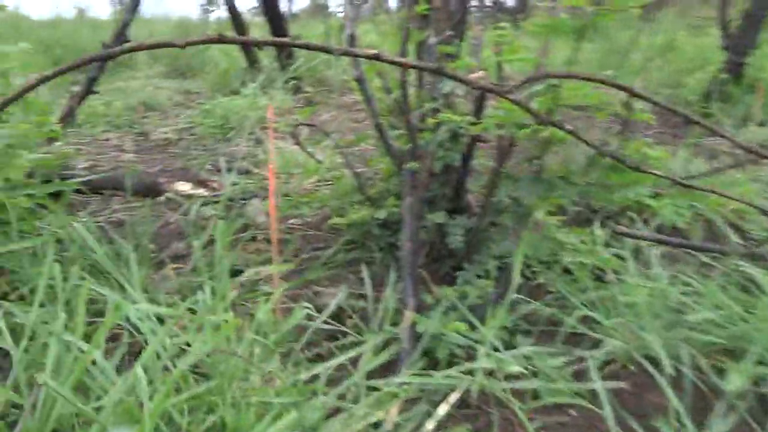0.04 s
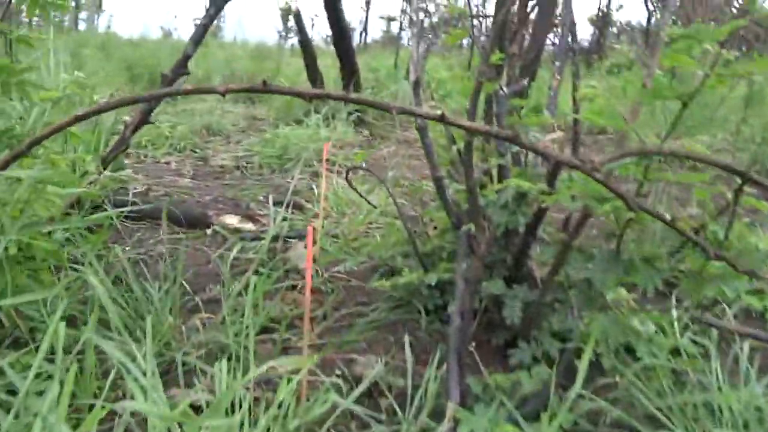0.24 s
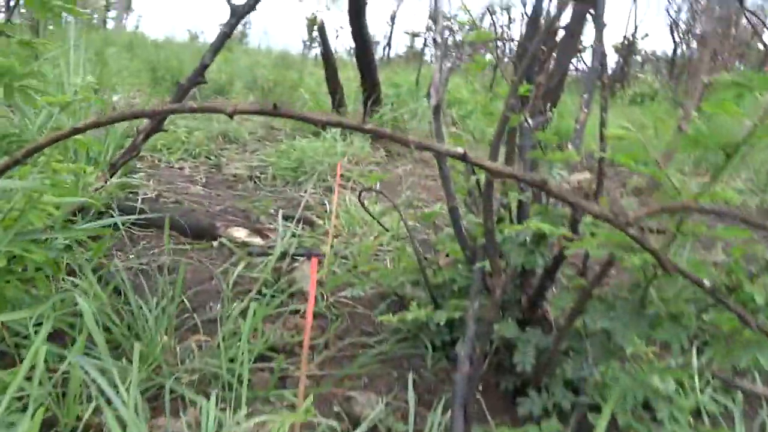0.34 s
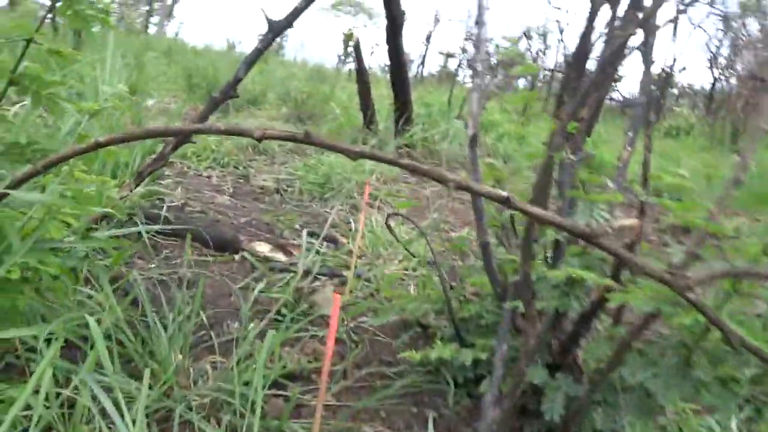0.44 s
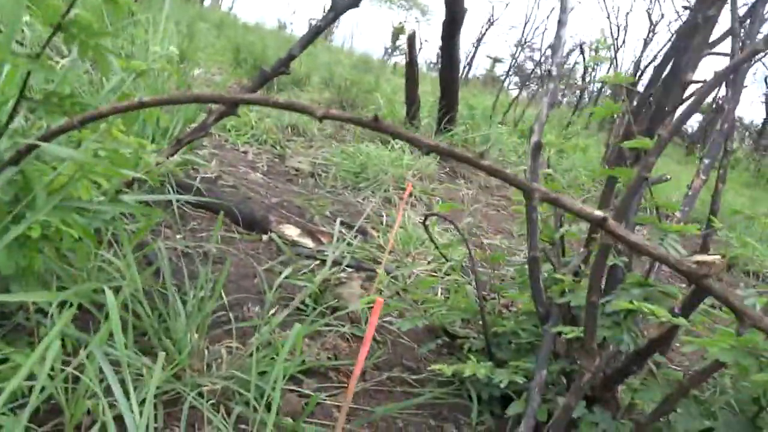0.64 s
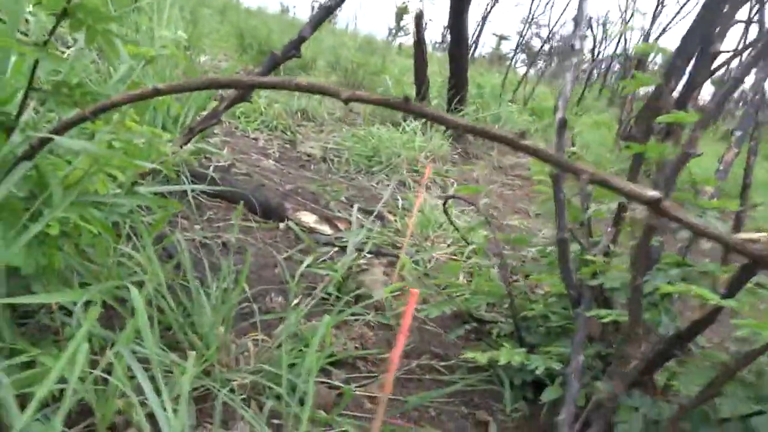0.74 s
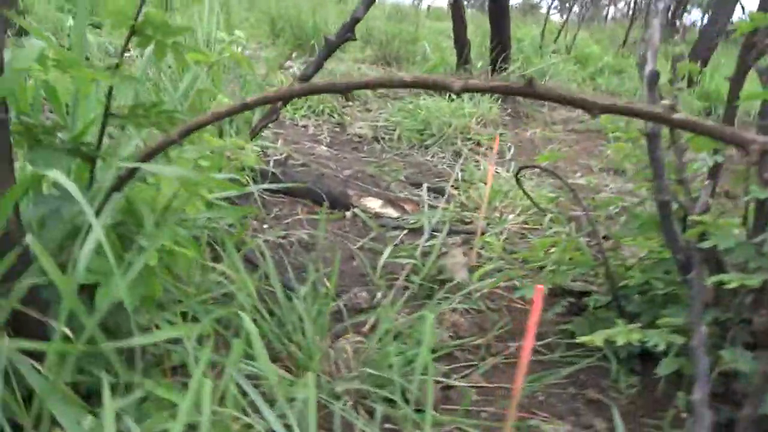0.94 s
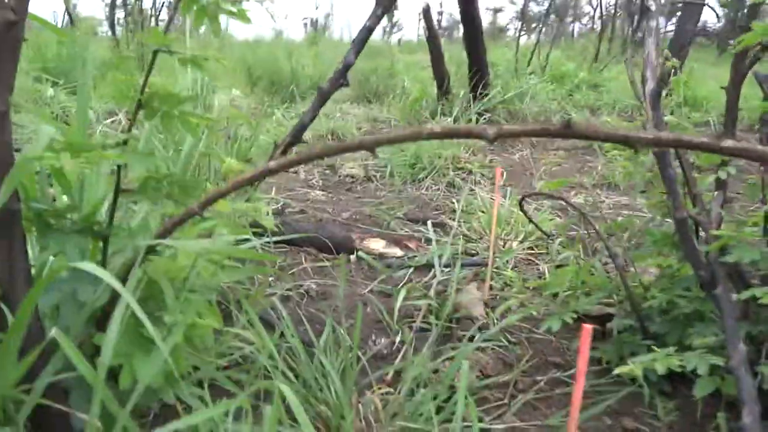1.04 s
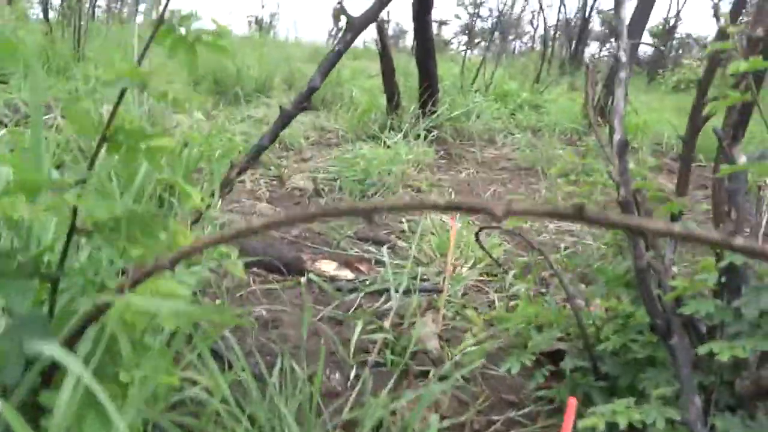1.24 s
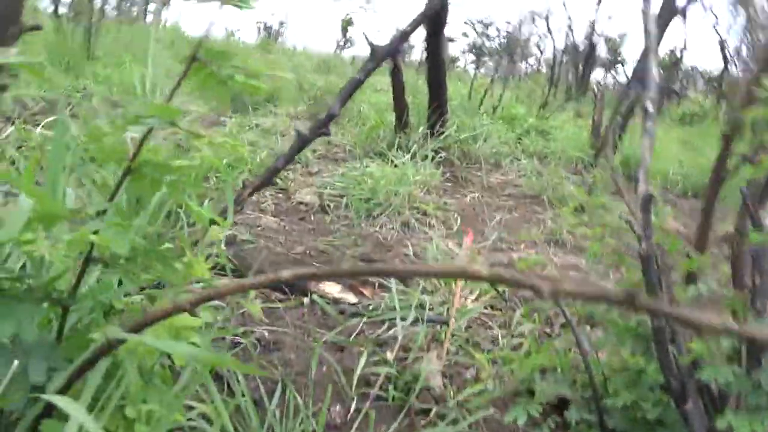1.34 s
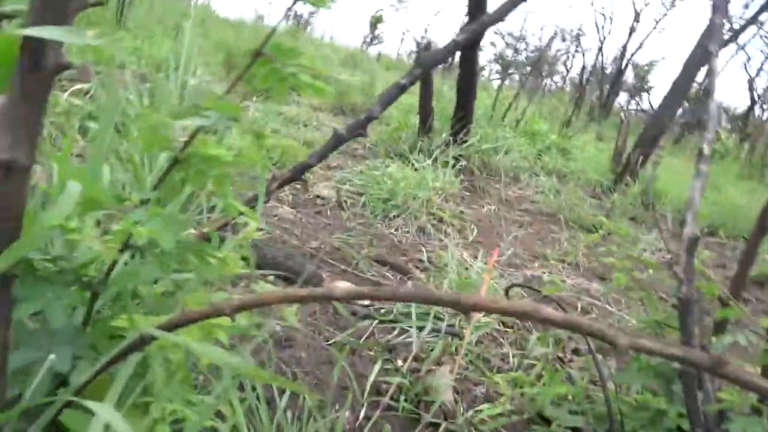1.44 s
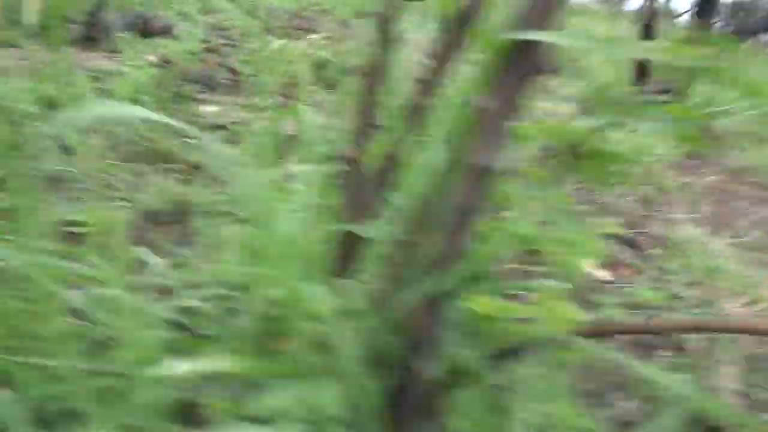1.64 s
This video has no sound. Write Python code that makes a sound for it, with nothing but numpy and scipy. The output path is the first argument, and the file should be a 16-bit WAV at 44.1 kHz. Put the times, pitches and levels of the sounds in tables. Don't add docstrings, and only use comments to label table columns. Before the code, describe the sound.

Pushing through grass and shrubs, close and dry. A faint open-field hum with tiny far bird chirps in the first 0.2 s; low wind puffs thump around 0.25-0.4 s. Grass hisses from 0.4 s; from 0.6 s stems rub dully and twigs knock, with bright snaps thickest at 0.72-0.83 s. A second gust and lighter brush, leaning right, come near 1.06 s, then sparse ticks fade until 1.7 s.

```python
import sys
import numpy as np
from scipy import signal
from scipy.fft import rfft, irfft, next_fast_len
from scipy.io import wavfile
from scipy.ndimage import uniform_filter1d, map_coordinates

SR = 44100
rng = np.random.default_rng(int(sys.argv[2]) if len(sys.argv) > 2 else 0)


def convert_level_to_amplitude(level_db):
    exponent = np.asarray(level_db, float) / 20
    return 10 ** exponent


def persist_wave(psi):
    counts = np.round(np.clip(psi, -1, 1) * 32767).astype(np.int16)
    wavfile.write(sys.argv[1], SR, np.atleast_2d(counts).T)


N = 74970

# t/s, left over right/dB
SIDE_OF_PATH = [
    (0, 0.5),
    (.95, 0),
    (1.0, -4),
    (1.08, -7.5),
    (1.14, 3),
    (1.22, -5),
    (1.45, -1),
    (1.56, 3),
]


def unit(x):
    return x / np.sqrt(np.mean(x ** 2) + 1e-20)


def along(points, hz):
    f, v = np.transpose(points)
    return np.interp(np.log(hz + 1), np.log(f + 1), v)


def curve(rows):
    s, v = np.transpose(rows)
    return np.interp(np.arange(N) / SR, s, v)


def wobble(rate):
    return map_coordinates(rng.standard_normal(400), [np.arange(N) * rate / SR])


def filtered(x, response):
    m = next_fast_len(x.shape[-1] + 8192)
    return irfft(rfft(x, m) * response(np.fft.rfftfreq(m, 1 / SR)), m)[..., :x.shape[-1]]


def ring(f, hz, width):
    return 1j * f * width / (hz * hz - f * f + 1j * f * width)


def rush(spectrum, patchy_db):
    # f/Hz, likeness (0 to 1)
    likeness = [(100, 0.99), (500, 0.85), (2500, 1), (5000, 1), (10000, 1)]
    z = signal.stft(rng.standard_normal((2, N)), nperseg=256)[2]
    patches = uniform_filter1d(rng.standard_normal(z.shape[1:]), size=5, axis=0)
    patches = uniform_filter1d(patches, size=8, axis=1)
    pair = signal.istft(z * convert_level_to_amplitude(patchy_db * unit(patches)), nperseg=256)[1][:, :N]

    def colour(hz):
        turn = np.arccos(np.clip(along(likeness, hz), -1, 1)) / 2
        return convert_level_to_amplitude(along(spectrum, hz)) * [np.cos(turn), np.sin(turn)]

    mid, side = filtered(pair, colour)
    return unit(np.array([mid + side, mid - side]))


def grains(hz, spread, cycles, scatter_db, count, size):
    u, g = rng.random((count, 2)), rng.standard_normal((count, 2))
    pitch = np.clip(hz * np.exp(spread * g[:, :1]), 100, 15000)
    t = np.arange(size) / SR
    level = convert_level_to_amplitude(-scatter_db * np.log(u[:, 1:] + 0.022))
    wave = level * np.sin(2 * np.pi * pitch * t) * np.exp(-t * pitch / cycles)
    at = ((u[:, :1] * N).astype(int) + np.arange(size)).ravel()
    pan = 0.75 * g[:, 1:]
    left, right = [np.bincount(at, (wave * convert_level_to_amplitude(side * pan)).ravel(), N + size)[:N] for side in (1, -1)]
    return unit(np.array([left, right]))


def add(track, s, sound, pan_db, skew=0):
    i = round(s * SR)
    track[0, i + skew:i + skew + len(sound)] += convert_level_to_amplitude(pan_db / 2) * sound
    track[1, i:i + len(sound)] += convert_level_to_amplitude(-pan_db / 2) * sound


def blow(db, t60, colour, spike):
    rise_s, spike_s = 0.00088, 0.0011
    t = np.arange(2000) / SR
    crackle = rng.standard_normal(len(t)) * convert_level_to_amplitude(-60 * t / t60) * (1 - np.exp(-t / rise_s))
    crackle[round(min(spike_s, t60 / 8) * SR)] += spike
    burst = filtered(crackle, colour)
    return convert_level_to_amplitude(db) * burst / np.abs(burst).max()


def field():
    # f/Hz, level/dB
    hum_colour = [(18, -44), (30, 5), (95, -4), (179, -26), (1630, -12.5), (3670, -23.5), (8300, -26),
                  (10200, -23.5), (16000, -31.5)]
    return convert_level_to_amplitude(-55.5) * rush(hum_colour, patchy_db=3.36)


def bird():
    # t/s, length/s, f/Hz, level/dB
    chirps = [
        (.004, .05, 3200, -63),
        (.022, .033, 7400, -65),
        (.156, .012, 7700, -61),
    ]
    t = np.arange(N) / SR
    out = np.zeros(N)
    for s, length, hz, db in chirps:
        swell = np.exp(-((t - s - length / 2) / (0.5 * length)) ** 4)
        out += convert_level_to_amplitude(db) * swell * np.sin(2 * np.pi * hz * t)
    return out


def air():
    # t/s, level/dB
    strength = [(0, -59.5), (.09, -56), (.14, -43), (.18, -53), (.23, -51.5), (.31, -32.5), (.4, -45.5),
                (.5, -63), (.6, -51), (.85, -50), (.97, -63), (1.035, -53), (1.06, -34.5), (1.14, -34.5),
                (1.22, -45.5), (1.4, -62.5), (1.62, -61.5), (1.7, -53)]
    # f/Hz, level/dB
    rumble_colour = [(15, -49), (25, -14.5), (75, 2), (107, 1.5), (183, -2.5), (277, -15), (307, -17),
                     (500, -33), (650, -76), (1100, -120)]
    # t/s, peak level/dB, f/Hz
    puffs = [(.135, -35.5, 129), (.158, -38, 102), (0.213, -37, 123), (.242, -25.5, 150), (0.289, -26, 98),
             (0.302, -24.5, 156), (0.333, -25.5, 125), (0.361, -39, 146), (.395, -28, 106),
             (.457, -35, 147), (0.637, -44, 69.5), (0.682, -38, 90), (0.769, -28, 272), (.8, -30.5, 247),
             (0.841, -32.5, 237), (.875, -43, 100), (.927, -41.5, 83), (1.016, -35.5, 91),
             (1.051, -27, 125), (1.06, -22.5, 142), (1.078, -32.5, 77), (1.089, -25.5, 156),
             (1.107, -24.5, 122.5), (1.123, -32, 101), (1.138, -32, 127), (1.17, -31, 111),
             (1.199, -36.5, 86.5), (1.265, -41.5, 80), (1.337, -41, 73), (1.536, -49.5, 53.6),
             (1.68, -39.5, 91)]
    rumble = convert_level_to_amplitude(curve(strength) + 3 * wobble(40)) * rush(rumble_colour, patchy_db=-0.3)
    out = np.pad(rumble, ((0, 0), (0, SR)))
    t = np.arange(-2500, 2500) / SR
    for (s, db, hz), turn in zip(puffs, rng.random(60)):
        wave = np.cos(2 * np.pi * (hz * t + turn))
        wave += 0.11 * np.cos(2 * np.pi * (2.19 * hz * t + 2 * turn))
        swell = np.exp(-(t * hz / 0.79) ** 2)
        add(out, s + t[0], convert_level_to_amplitude(db) * swell * wave, 0)
    return out[:, :N]


def snaps():
    # t/s, peak level/dB, f/Hz, t60/s, width over pitch
    breaks = [(.106, -43.5, 2880, 0.015, 0.32), (.107, -52, 6600, .02, 0.083),
              (0.143, -42, 7200, 0.021, 0.31), (0.224, -45, 6170, .012, 0.28),
              (0.7174, -24, 3960, 0.015, 0.47), (.728, -17.5, 10370, 0.017, 0.37),
              (0.736, -18, 12900, 0.008, 0.4), (0.7375, -28, 11600, .012, .45),
              (0.7533, -29, 6350, 0.011, .09), (0.756, -25, 11000, .02, 0.33),
              (0.7613, -10.5, 10430, 0.013, 0.18), (0.763, -21.5, 5800, 0.024, 1.1),
              (0.7672, -22, 11400, .008, .4), (.777, -20.5, 10100, 0.037, 0.23),
              (0.782, -24, 10600, .009, .3), (0.7851, -12.5, 10650, 0.018, 0.28),
              (0.7837, -23.5, 6370, 0.025, 0.35), (.7905, -22, 10800, .012, 0.26),
              (0.8028, -25, 10460, 0.031, 0.24), (0.806, -29, 5000, 0.00604, 0.68),
              (0.827, -28, 8300, 0.031, 0.056), (0.8267, -23.5, 9900, 0.031, 0.21),
              (0.827, -26, 4170, 0.0081, .9), (.855, -36, 5700, .012, 0.59),
              (1.069, -21, 7100, 0.0046, 0.85), (1.069, -31, 2280, 0.02, 0.42),
              (1.137, -32, 8500, .005, 0.9), (1.137, -39.5, 2280, .012, 0.33),
              (1.212, -39, 2860, 0.021, 0.38), (1.211, -38, 9000, 0.0055, 0.54),
              (1.232, -39, 8500, 0.0076, 0.46), (1.353, -34, 10000, 0.0093, 0.8),
              (1.455, -29.5, 10800, 0.0086, 0.26)]
    out, pan_db = np.zeros((2, N + SR)), curve(SIDE_OF_PATH)
    for s, db, hz, t60, wide in breaks:
        crack = lambda f: ring(f, hz, wide * hz) ** 2 + 0.12 * ring(f, hz / 2, 0.8 * hz) ** 3
        add(out, s, blow(db, t60, crack, spike=2.33), pan_db[round(s * SR)], int(wide > 1))
    return out


def grass():
    # t/s, level/dB
    effort = [(0, -61), (.3, -60.5), (.38, -49.5), (.48, -53), (.56, -46), (.66, -42.5), (.69, -49.5),
              (.72, -41), (.8, -48), (.9, -46.5), (1.0, -49), (1.045, -54), (1.075, -44), (1.12, -54),
              (1.22, -50), (1.3, -57.5), (1.55, -52.5), (1.7, -55.5)]
    # f/Hz, level/dB
    blade_colour = [(1500, -33), (2600, -9), (4000, -15), (6500, -9), (9000, -8.5), (9900, 0.5),
                    (11500, -1), (15500, -20)]
    fizz = grains(8750, spread=0.28, cycles=0.63, scatter_db=3.0, count=9000, size=64)
    hiss = unit(rush(blade_colour, patchy_db=1.3) + convert_level_to_amplitude(-8) * fizz)
    return convert_level_to_amplitude(curve(effort) + 0.56 * wobble(39.4)) * hiss


def brushes():
    # middle t/s, length/s, level/dB, f/Hz, width over pitch
    wipes = [
        (1.016, 0.017, -42.5, 2600, 2.6),
        (1.021, 0.01, -49.5, 4050, .4),
        (1.228, 0.022, -55, 1750, 1.8),
        (0.955, 0.05, -54.5, 2470, .5),
        (1.17, 0.035, -51.5, 8100, 1.5),
        (0.386, 0.024, -57.5, 7500, 0.83),
    ]
    t, out = np.arange(N) / SR, 0
    lean_db = curve(SIDE_OF_PATH) * [[0.5], [-0.5]]
    for s, length, db, hz, wide in wipes:
        raw = grains(7300, spread=0.92, cycles=0.33, scatter_db=-1.5, count=9000, size=32)
        raw = raw + 0.96 * rng.standard_normal(N)
        raw = raw + 0.32 * rng.standard_normal((2, N))
        leaf = unit(filtered(raw, lambda f: ring(f, hz, wide * hz) ** 2))
        out = out + convert_level_to_amplitude(db + lean_db) * np.exp(-((t - s) / length) ** 2) * leaf
    return out


def stems():
    # t/s, level/dB
    strength = [(0, -65), (.45, -57), (.595, -53.5), (.61, -45), (.66, -40.5), (.69, -54), (.705, -39.5),
                (.77, -38), (.81, -49), (.83, -44.5), (.865, -39), (.88, -48), (1.0, -56), (1.2, -51.5),
                (1.35, -62.5), (1.55, -55.5), (1.65, -58.5), (1.7, -55.5)]
    # f/Hz, level/dB
    stalk_colour = [(130, -16), (270, -3.5), (380, -2), (600, -4), (1000, -6), (1900, -13.5), (2600, -19.5),
                    (6000, -33), (11000, -120)]
    crunch = grains(1000, spread=0.4, cycles=1.0, scatter_db=4.0, count=900, size=500)
    rub_db = curve(strength)
    grit = convert_level_to_amplitude(-9 + rub_db - rub_db.max())
    rub = (rush(stalk_colour, patchy_db=2.2) + grit * crunch) / np.sqrt(1 + grit ** 2)
    return convert_level_to_amplitude(rub_db + 0.87 * wobble(45.07)) * rub


def knocks():
    # t/s, peak level/dB, f/Hz, t60/s
    hits = [(.479, -35, 800, 0.01), (0.604, -37, 714, 0.012), (.626, -20, 580, 0.016),
            (.641, -31, 605, 0.034), (0.652, -31, 555, 0.01), (.66, -29.5, 510, 0.019),
            (0.66, -43, 940, .012), (0.671, -30, 800, 0.014), (0.699, -22.5, 620, 0.012),
            (.708, -39, 700, .012), (.719, -23, 900, 0.0097), (0.724, -28.5, 565, 0.015),
            (0.751, -36, 1600, 0.007), (0.7608, -21.5, 820, 0.0077), (0.766, -26.5, 675, 0.009),
            (.774, -27, 614, 0.017), (.779, -35, 886, .012), (0.784, -29.5, 920, 0.008),
            (0.788, -24.5, 400, 0.024), (0.806, -35, 1290, 0.0076), (.818, -24.5, 590, 0.0092),
            (0.828, -28.5, 790, 0.029), (.848, -34, 400, 0.0096), (.857, -29, 1270, 0.0105),
            (.93, -36, 800, .012), (.97, -37.5, 473, 0.022), (1.069, -28, 1400, 0.017),
            (1.2115, -35.5, 1200, 0.016), (1.234, -38.5, 1160, .02), (1.453, -48, 655, 0.024),
            (1.464, -41.5, 620, 0.02), (1.547, -41, 1200, 0.0053), (1.562, -34, 1100, 0.0041),
            (1.608, -43, 1084, .006), (1.683, -41, 446, 0.015)]
    branch_hz, branch_width_hz, wood_top_hz = 1837, 590, 2440
    out, pan_db = np.zeros((2, N + SR)), curve(SIDE_OF_PATH)

    for s, db, hz, t60 in hits:
        def wood(f):
            rings = ring(f, hz, 0.49 * hz) - 0.43 * ring(f, branch_hz, branch_width_hz)
            return rings / (1 + 1.4j * f / wood_top_hz - (f / wood_top_hz) ** 2)

        skew = rng.integers(-3, 4)
        add(out, s, blow(db, t60, wood, spike=4.74), 0.99 + pan_db[round(s * SR)], skew)
    return out


def twigs():
    out = snaps() + knocks()
    t = np.arange(SR // 8) / SR
    tail = rng.standard_normal(len(t)) + 0.81 * rng.standard_normal((2, len(t)))
    tail = tail * convert_level_to_amplitude(-60 * t / 0.059)
    wet = signal.fftconvolve(out.mean(0)[None], tail / np.linalg.norm(tail[0]), axes=1)
    return out[:, :N] + convert_level_to_amplitude(-15) * wet[:, :N]


def scene():
    return field() + bird() + air() + grass() + brushes() + stems() + twigs()


def low_pass(x):
    return signal.sosfilt(signal.butter(12, 16800, fs=SR, output="sos"), x)


def record(dry):
    # f/Hz, level/dB
    lean = [(200, -0.5), (1000, 1), (4000, 0.5), (9000, -2)]
    # f/Hz, phase/rad
    lead = [(40, -0.076), (170, -0.6), (300, -0.057), (600, 0.59), (2000, 0.77), (4000, 0.65), (9000, 0.35)]

    def ports(hz):
        tilt = convert_level_to_amplitude(0.5 * along(lean, hz)) * np.exp(0.5j * along(lead, hz))
        return np.array([tilt, 1 / tilt]) / (1 + (hz / 15800) ** 60)

    return low_pass(filtered(dry, ports))


dry = scene()
out = record(dry)
persist_wave(out)
```